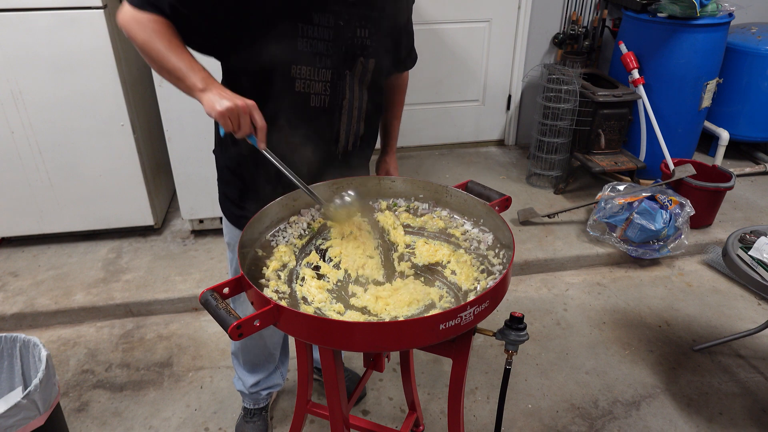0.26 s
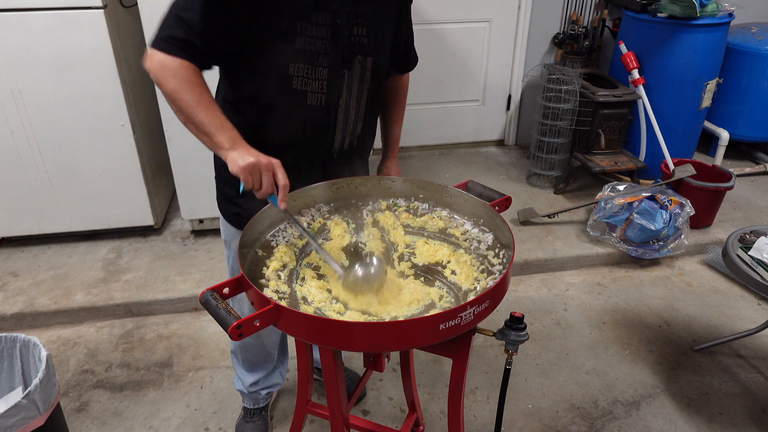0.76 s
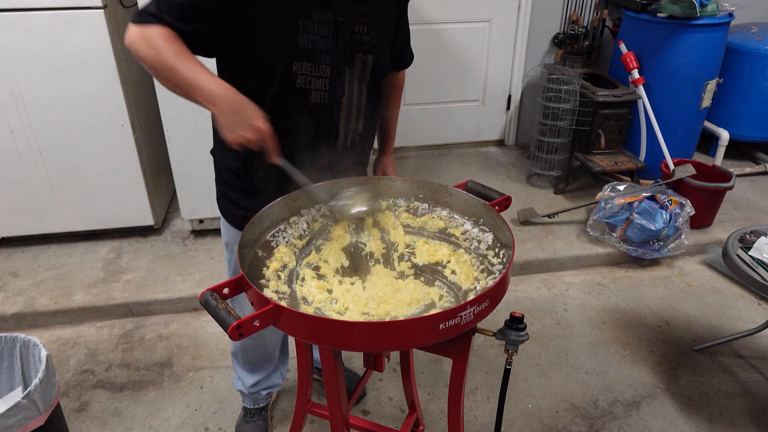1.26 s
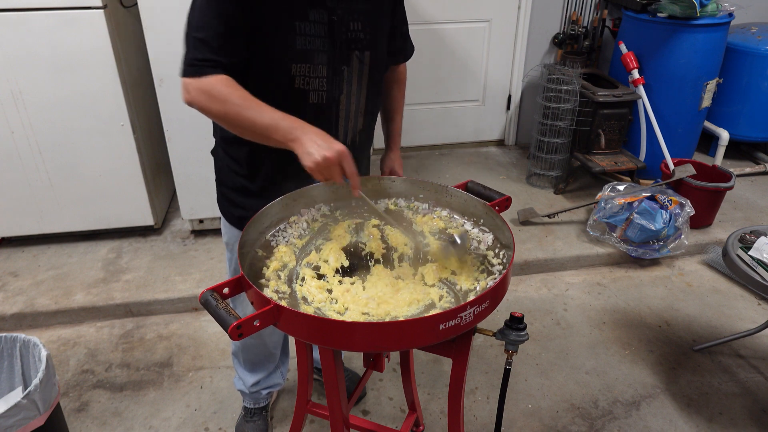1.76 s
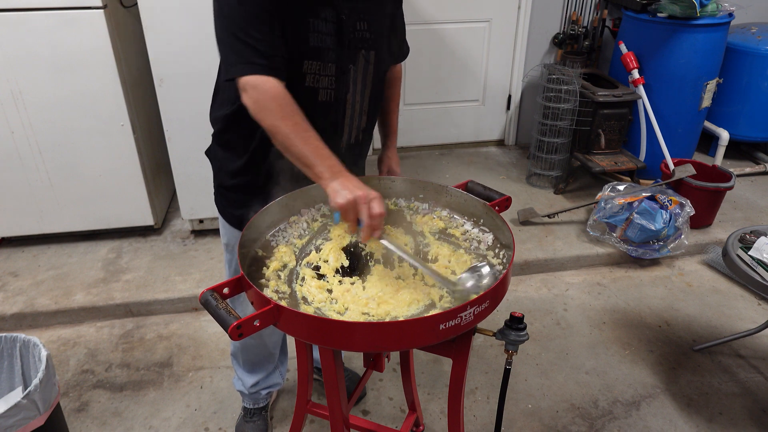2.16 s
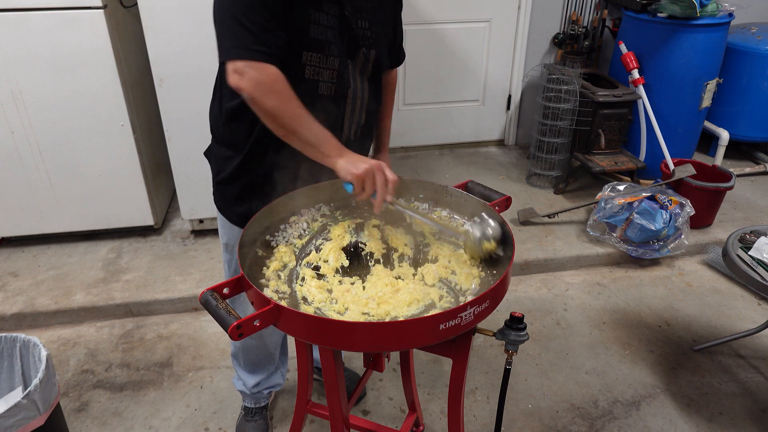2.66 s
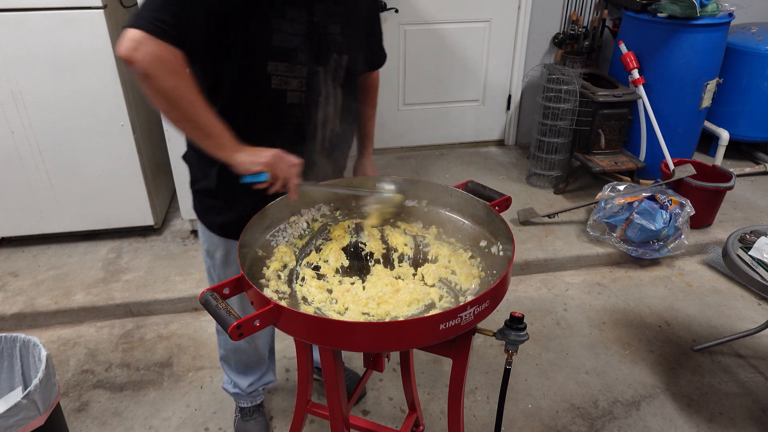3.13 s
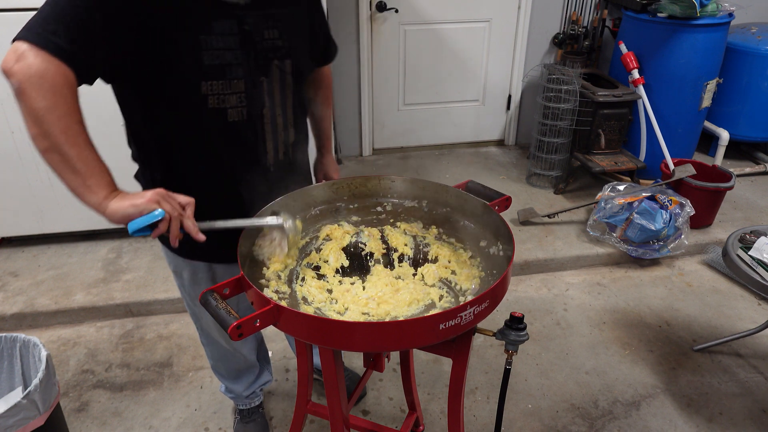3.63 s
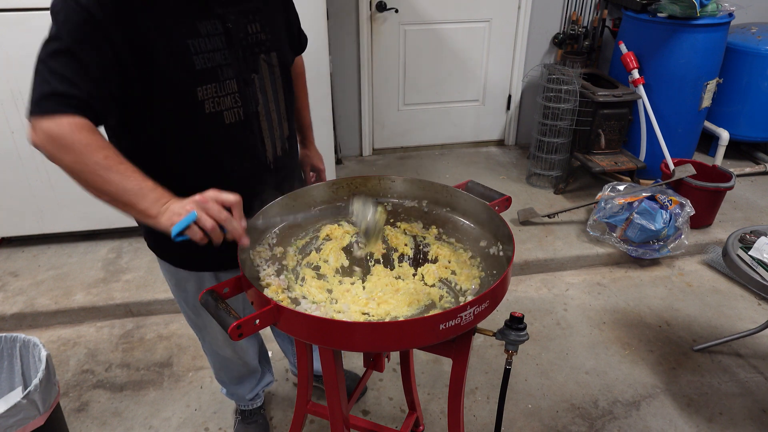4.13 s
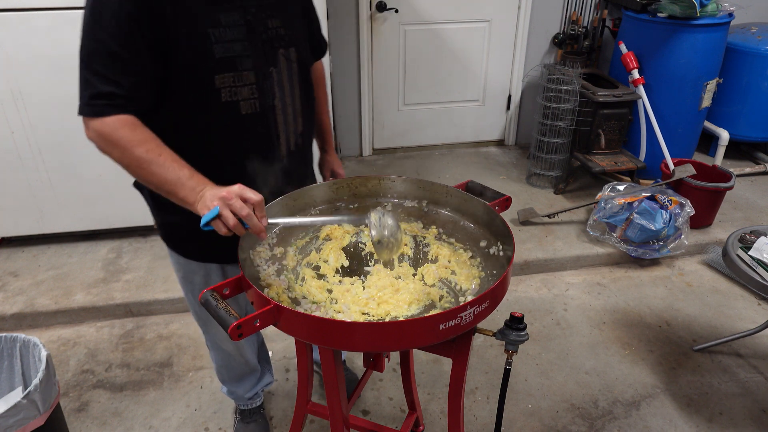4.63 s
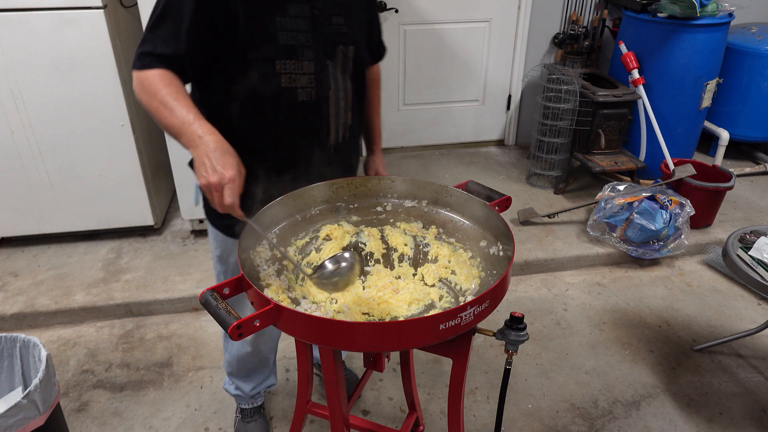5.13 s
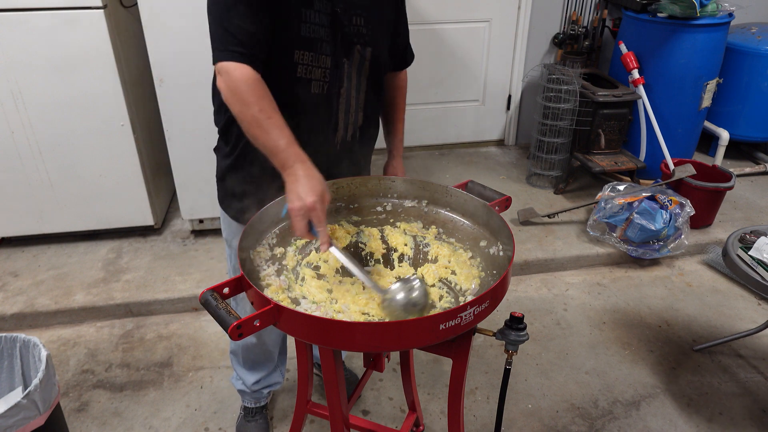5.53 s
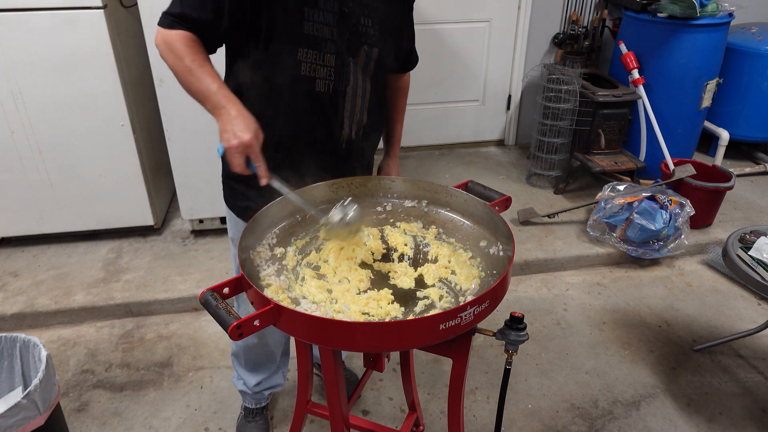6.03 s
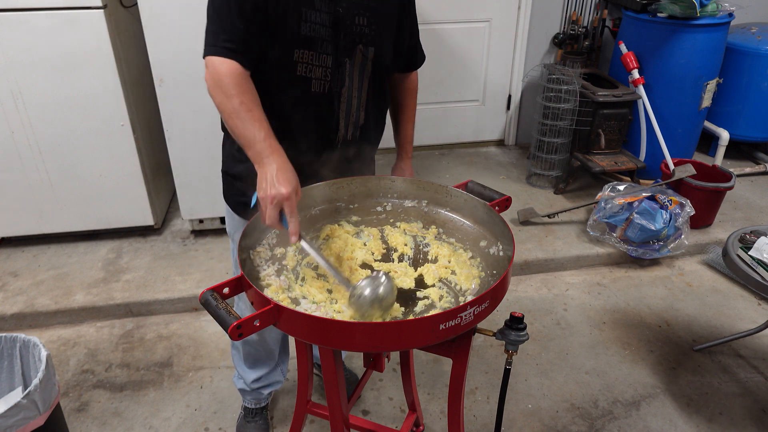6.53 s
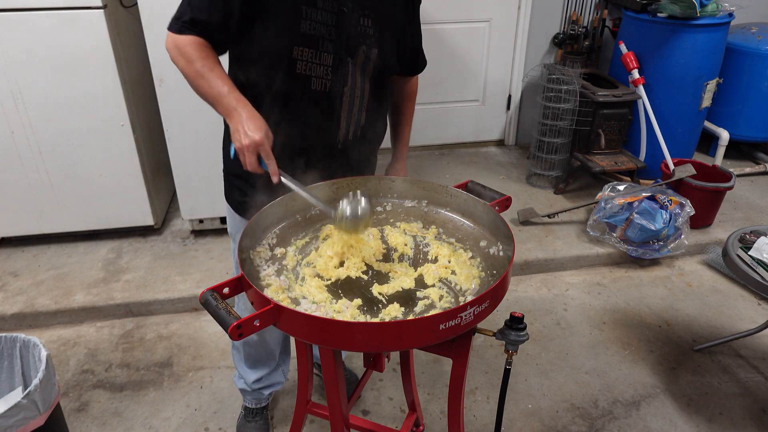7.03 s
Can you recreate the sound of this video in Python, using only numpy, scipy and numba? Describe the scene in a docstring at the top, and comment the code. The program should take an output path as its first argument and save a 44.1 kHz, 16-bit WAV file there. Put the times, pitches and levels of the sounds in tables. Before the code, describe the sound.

Eggs sizzle in oil in a wide metal pan throughout, the fizz swelling after stirs, over the faint low rush of a gas burner. At about 0.5 seconds a steel ladle knocks the pan and gives a brief scrape. Loud, bright clangs follow from 1.2 to 1.6 seconds, and the strongest cluster comes at about 2.1 seconds. The ladle's bowl rings on after the blows, and the pan rocks on its stand with dull bumps. From 2.5 to 4 seconds a long rasping scrape travels around the pan, ending with a light knock. Softer frying and a faint ring remain until a short, firmer scrape from 5.6 to 5.9 seconds. Two light knocks come near 6.8 seconds, and single spits of oil pop through the last seconds. Everything is heard close and straight ahead, with a short echo from bare garage walls.

```python
'''A steel ladle stirs scrambled eggs in a wide metal pan on a gas burner stand, in a garage.
The ladle knocks and scrapes the pan, and its bowl sings on; the pan rocks on its stand.
Oil sizzles and spits, flaring up after every stir, over the low rush of the burner.
Heard close, as from one microphone with the pan straight ahead and a short tail off the bare walls.'''
import sys
import numpy as np
from scipy import signal
from scipy.fft import rfft, irfft
from scipy.io import wavfile
from scipy.ndimage import uniform_filter1d, minimum_filter1d
from numba import njit

SR = 44100
rng = np.random.default_rng(int(sys.argv[2]) if len(sys.argv) > 2 else 0)


def unload_wav(signal):
    """Save mono or channel-first audio to the path in sys.argv[1] as 16-bit WAV at rate SR, clipped to [-1, 1]."""
    wavfile.write(
        sys.argv[1],
        SR,
        np.round(np.clip(np.atleast_2d(signal).T, -1, 1) * 32767).astype(np.int16),
    )


N = 321489
T = np.arange(N) / SR

# Levels in the tables are relative; spectra give the level per Hz.
# spectrum of the gas flame: f/Hz, level/dB
FLAME_SPECTRUM = [(20, -4), (42, -6.5), (65, -2.5), (95, -7), (125, 6), (155, 1.5), (200, -5), (330, -4),
                  (500, -6), (1000, -10), (2000, -16.5), (6000, -30)]
# spectra of the oil's fine fizz and wet crackle: f/Hz, level/dB
FIZZ_SPECTRUM = [(1500, -17), (3500, -7), (4600, -3), (5600, 0), (7200, 0.5), (8300, -3.5), (9500, -10.5),
                 (12000, -14.5), (16000, -16.5)]
CRACKLE_SPECTRUM = [(300, -9), (700, -3), (1100, 4.5), (1700, 1.5), (2800, 3), (4000, -0.5), (5500, -13),
                    (9000, -24), (16000, -23)]
# wet egg is turned onto hot metal and the frying flares up: peak t/s, level/dB
STIR_FLARES = [(0, -39), (.19, -62), (.75, -40.5), (1.55, -43.5), (3.6, -48.5), (5.8, -40.5), (6.6, -48),
               (6.85, -47.5), (7.15, -48)]
# the ladle bowl's modes, in three pairs: f/Hz, level/dB, t60/s
BOWL_PAIRS = [
    [(556.7, -0.5, 3.22), (900, -6, 1.84)],
    [(710, -1.5, 3.56), (1061, -6.5, 3.6)],
    [(731.6, -0.5, 1.9), (872, -3, 2.07)],
]
# the bowl ringing free: start t/s, damped from t/s, then starting level/dB of each pair
FREE_RINGS = [(0, 1.188, -32, -36, -30), (1.342, 2.098, -29, -45.5, -55), (2.098, 2.465, -48.5, -37, -29.5),
              (3.62, 5.497, -65, -44.5, -56)]
# the stand's low modes: f/Hz, level/dB, t60/s
FRAME_MODES = [(113.1, -15.5, 0.45), (180, -4.5, 0.14), (232.6, -9.5, 0.36), (288.5, -1.5, 0.16),
               (318, -5.5, 0.29), (338.6, -12, .22), (410, -14, 0.21), (447.7, -3.5, 0.37), (536, -36, .12)]
# the pan set rocking: t/s, level/dB, gap to the first rebound/s, loss per rebound/dB
PAN_ROCKS = [(.066, -26.5, 0.057, 9), (.649, -20, 0.095, 7.5), (.854, -21.5, 0.067, 6),
             (1.212, -21, 0.16, 9), (1.517, -17, 0.093, 4), (2.098, -22, .139, 9), (3.866, -28.5, 0.077, 2),
             (5.564, -38.5, .07, 13)]
# ladle on pan: t/s, level/dB, dull above f/Hz, favoured f/Hz, contact/s, pan ring up and stem down/dB
LADLE_BLOWS = [(0.492, -13.5, 2500, 1260, 0.00033, -8), (0.5093, -20, 5000, 1190, 0.00077, -4),
               (.617, -25, 9500, 5640, 0.0037, 2), (0.647, -14.5, 1320, 330, 0.0055, -10),
               (1.2118, 0.5, 12400, 2580, 0.0038, 8.5), (1.3063, -8.5, 1500, 1290, 0.0068, -6),
               (1.338, -7, 14000, 2460, 0.0026, -13), (1.347, -5.5, 1770, 1110, 0.0044, -2),
               (1.5195, -13, 2380, 1290, 0.0028, 2.5), (1.574, -24.5, 1980, 1080, 0.0043, 10.5),
               (1.596, -25, 2100, 1220, 0.0029, -3), (2.0981, 4, 4100, 1520, 0.004, 9.5),
               (2.124, -8.5, 2200, 1820, .009, -5), (2.141, -6, 2000, 1060, 0.0087, -5),
               (2.175, -15, 2200, 980, 0.0051, 5), (2.254, -11, 3270, 950, 0.014, -2),
               (2.44, -24.5, 1400, 950, .012, -3), (3.7962, -23, 3460, 1360, 0.02, -2),
               (5.5618, -25.5, 5500, 1290, 0.002, 3), (5.843, -27.5, 2400, 1240, 0.012, 6.5),
               (6.7467, -19.5, 8000, 1410, 0.0084, 0), (6.829, -26.5, 2600, 1460, 0.028, -1.5)]
# clear modes of the pan and of the ladle's stem: f/Hz, level/dB, t60/s
PAN_MODES = [(335.3, -6.5, 0.26), (515.3, -8, 0.35), (738, -11, 0.32), (883, -7.5, 0.82), (947, -1, 0.38),
             (978, 4, .48), (1075, 0, .45), (1134, -3.5, .33), (1319, -8.5, .4), (1404, -11, .42),
             (1462, -15, .38), (1626, -19, .4), (1793, -9, .36), (1818, -12, .3), (2046, -12, .35),
             (2562, -14, .3), (2637, -3.5, .24), (2840, -13, 0.42), (3456, -35.5, 0.55), (4000, -11, 0.52),
             (4130, -9, 0.28), (7440, -7, 0.37)]
STEM_MODES = [(2288, -12, .35), (2708, -9, .3), (3714, -6, .32), (3926, -6, .35), (4533, -14, .4),
              (5271, -5, .28), (5373, -8, .45), (5416, -3, .45), (6648, -2, .25), (6971, -1, .34),
              (8430, -10, .32), (8640, -9, .3)]
# spectrum of the pan's dense wash of modes: f/Hz, level/dB
CLANG_SPECTRUM = [(100, -18), (320, 5), (700, -1), (1100, 2), (1500, -1), (1950, -1.5), (2600, -1),
                  (3200, -4.5), (3900, -2.5), (4700, -3), (6500, 0.5), (8300, -5.5), (10000, -16),
                  (16000, -25.5)]
# resonances of the ladle pressed on the pan, mid rasp and bright edge: f/Hz, width/Hz, level/dB
RASP_BANDS = [(1448, 89, 2.5), (2394, 60, 0), (2714, 180, 4), (3604, 105, 5.5), (3870, 330, 1.5)]
EDGE_BANDS = [(5277, 230, 3), (6010, 230, -4.5), (6620, 720, -1), (8200, 120, -8)]
# spectra of the pan's body under a scrape and of fine grit dragged by the ladle: f/Hz, level/dB
BODY_SPECTRUM = [(200, -42), (330, 6), (480, -26), (580, 4.5), (720, -13.5), (820, -6), (985, 0),
                 (1120, -1), (1400, 0.5), (1750, -7.5), (2500, -32.5)]
GRIT_SPECTRUM = [(800, -28), (1700, 12), (4000, 16), (8300, -2), (9400, -22), (12000, -10), (16000, -4)]
# the contact point travels round the pan: t/s, scratch f/Hz, pan drone f/Hz
CONTACT_PATH = [(.75, 2520, 950), (2.541, 2340, 960), (2.62, 2770, 950), (2.82, 2830, 1000),
                (2.85, 3250, 1020), (2.98, 3100, 1000), (3.05, 2840, 710), (3.19, 2960, 707),
                (3.26, 2850, 725), (3.55, 2470, 646), (3.75, 2380, 1234), (5.6, 3170, 1060),
                (5.74, 3750, 1010), (5.84, 2670, 1230)]
# the scratch and its overtones: multiple, level/dB
SCRATCH_PARTIALS = [(1, 5.5), (2, 0), (4, -20)]
# ladle pressure in a brief nudge, a long sweep round the wall and a short push across: t/s, level/dB
NUDGE = [(0.59, -40), (0.646, -30), (0.71, -44), (0.734, -27), (0.76, -29), (0.785, -32)]
SWEEP = [(2.54, -31.5), (2.574, -33), (2.654, -30.5), (3.318, -28), (3.414, -32), (3.422, -27.5),
         (3.5, -31.5), (3.532, -27.5), (3.662, -35.5), (3.778, -37), (3.804, -31.5), (3.868, -38.5),
         (3.904, -34), (3.96, -45.5)]
PUSH = [(5.57, -28.5), (5.578, -32.5), (5.652, -18), (5.684, -21), (5.756, -19), (5.78, -26), (5.83, -22),
        (5.91, -47)]
# strokes: pressure curve, meets the pan wall t/s, body/dB, body thin below f/Hz, scratch/dB, edge/dB
LADLE_STROKES = [(NUDGE, .72, -0.5, 820, 0.7, -23), (SWEEP, 2.53, -7.5, 555, 0, -2.06),
                 (PUSH, 5.72, -9, 770, -10, -1.2)]
# the loudest spits of oil: t/s, peak level/dB
LOUD_SPITS = [(1.1489, -24), (4.146, -33), (4.342, -29), (5.521, -28), (6.122, -22), (6.2298, -28),
              (7.0878, -26), (7.187, -22.5)]


def undb(db):
    """Decibels to gain."""
    return 10 ** (np.asarray(db) / 20)


def unit(x):
    """Scale to rms 1."""
    return x / np.sqrt(np.mean(x ** 2))


def add(out, s, x):
    """Mix x into out from time s."""
    i = max(int(s * SR), 0)
    out[i:i + len(x)] += x[:max(N - i, 0)]


def convolve(x, response):
    """Pass x through a response, keeping its length."""
    return signal.fftconvolve(x, response)[:len(x)]


def colour(x, spectrum, size=2048):
    """Minimum-phase filter of unit energy, shaped by rows of f/Hz, level/dB."""
    hz, db = np.transpose(spectrum)
    shape_db = np.interp(np.log(np.arange(size // 2 + 1) * SR / size + 1), np.log(hz), db)
    cepstrum = irfft(np.log(undb(shape_db)))
    cepstrum[1:size // 2] *= 2
    cepstrum[size // 2 + 1:] = 0
    response = irfft(np.exp(rfft(cepstrum)))
    return convolve(x, response / np.linalg.norm(response))


def cut(x, hz, kind, order=2):
    """Low-pass or high-pass."""
    return signal.sosfilt(signal.butter(order, min(hz, SR / 2 - 1000), kind, fs=SR, output="sos"), x)


def between(x, low_hz, high_hz):
    """High-pass, then low-pass."""
    return cut(cut(x, low_hz, "high"), high_hz, "low")


@njit
def resonate(x, hz, width_hz):
    """Band-pass whose centre can move every sample."""
    y, band_state, low_state = np.empty(len(x)), 0., 0.
    for i in range(len(x)):
        g, damping = np.tan(np.pi * hz[i] / SR), width_hz / hz[i]
        band = (band_state + g * (x[i] - low_state)) / (1 + g * (g + damping))
        band_state = 2 * band - band_state
        low_state += 2 * g * band
        y[i] = damping * band
    return y


def resonances(x, bands, ratio):
    """Sum of band-passes, all shifted by a moving frequency ratio."""
    return sum(undb(db) * resonate(x, hz * ratio, float(width)) for hz, width, db in bands)


def fade(t, t60):
    """Full level until t = 0, then free decay, 60 dB down after t60."""
    return np.exp(-np.log(1000) * np.maximum(t, 0) / t60)


def ring(modes):
    """One second of struck modes, unit energy; neighbours start in opposite directions."""
    t = T[:SR]
    y = sum((-1) ** k * undb(db) * fade(t, t60) * np.sin(2 * np.pi * hz * t)
            for k, (hz, db, t60) in enumerate(modes))
    return y / np.linalg.norm(y)


def walk(rate):
    """Smooth random wander of spread near 1."""
    knots = rng.standard_normal(4096)
    return np.interp(T * rate, np.arange(len(knots)), knots)


def grains(rate, spread_db):
    """Random tiny impulses, about rate a second, most small and a few large."""
    chance, size = rng.random(N), np.minimum(rng.exponential(size=N), 5)
    return unit((chance < rate / SR) * undb(spread_db * size) * rng.choice([-1, 1], N))


def burner(level_db=-55, flutter_db=1):
    """The gas flame rushes softly under the pan."""
    rush = unit(colour(rng.standard_normal(N), FLAME_SPECTRUM, size=8192))
    return rush * undb(level_db + flutter_db * walk(10))


def frying(rest_db, flare_db, t60, rise_s=0.098):
    """Strength of the frying: a resting level, and at each stir a flare that dies as water boils off."""
    flares = (undb(db + flare_db) * np.clip((T - s) / rise_s + 1, 0, 1) * fade(T - s, t60)
              for s, db in STIR_FLARES)
    return np.sqrt(undb(rest_db) ** 2 + sum(flare ** 2 for flare in flares))


def sizzle(flicker_db=1, pops_db=-20):
    """Steam bubbles burst in the oil: a fine fizz with scattered pops, and a coarser wet crackle."""
    fizz = unit(colour(grains(rate=7000, spread_db=3), FIZZ_SPECTRUM))
    pops = unit(between(grains(rate=37, spread_db=2), 1800, 6000))
    crackle = unit(colour(grains(rate=3000, spread_db=1), CRACKLE_SPECTRUM))
    fine = (fizz + undb(pops_db) * pops) * frying(rest_db=-52.5, flare_db=0, t60=5.37)
    coarse = crackle * frying(rest_db=-59, flare_db=-2, t60=2.8)
    return (fine + coarse) * undb(flicker_db * walk(25))


def ladle_bowl(damped_t60=0.82):
    """The ladle's bowl rings on, then fades quickly from each listed damping time."""
    out, t = np.zeros(N), T[:2 * SR]
    for s, damped_s, *levels_db in FREE_RINGS:
        tone = sum(undb(pair_db + db) * fade(t, t60) * np.sin(2 * np.pi * hz * t)
                   for pair, pair_db in zip(BOWL_PAIRS, levels_db) for hz, db, t60 in pair)
        add(out, s, tone * fade(t - (damped_s - s), damped_t60))
    return out


def rocking_pan(bump_t60=0.093, bump_db=-15, strength_db=17, landings=4, gap_shrink=0.63):
    """The heavy pan tips onto its stand and rebounds ever sooner: dull bumps and the frame's modes."""
    out, frame = np.zeros(N), ring(FRAME_MODES)
    for s, db, gap_s, loss_db in PAN_ROCKS:
        for k in range(landings):
            burst = rng.standard_normal(SR) * fade(T[:SR], bump_t60)
            bump = cut(cut(burst, 610, "low", order=4), 134, "high")
            add(out, s, undb(db + strength_db - k * loss_db) * (frame + undb(bump_db) * bump))
            s += gap_s * gap_shrink ** k
    return out


def ladle_knocks(crack_t60=0.029, wash_db=-44, wash_t60=0.75, pan_db=-12, ladle_db=-18.5,
                 hollow_db=6, favour_db=5, strength_db=17):
    """Each blow chatters briefly, then the pan's wash, its clear modes and the ladle stem ring out."""
    out, t, steady = np.zeros(N), T[:SR], np.ones(SR)
    for s, db, dull_hz, favoured_hz, contact_s, lean_db in LADLE_BLOWS:
        contact = fade(t - contact_s, crack_t60)
        contact /= np.linalg.norm(contact)
        wash = fade(t, wash_t60) * undb(wash_db)
        clang = colour(rng.standard_normal(SR) * np.hypot(contact, wash), CLANG_SPECTRUM)
        thin_hz = 677 * (dull_hz / 3410) ** 0.63  # a harder blow is both brighter and thinner
        pan = cut(cut(clang, thin_hz, "high", order=1), 270, "high")
        pan += undb(pan_db + lean_db) * ring(PAN_MODES)
        # the spot that is struck favours one group of the pan's modes
        pan += undb(favour_db) * resonate(pan, favoured_hz * steady, width_hz=200.)
        ladle = ring(STEM_MODES) + undb(hollow_db) * resonances(clang, RASP_BANDS + EDGE_BANDS, steady)
        # egg between the two metals softens the blow
        blow = cut(pan + undb(ladle_db - lean_db) * ladle, dull_hz, "low")
        add(out, s, undb(db + strength_db) * blow)
    return out


def stick_slip(judder_db=1.5, scratch_width_hz=240., drone_db=-2, pan_db=-9, stem_db=-11, grit_db=-7):
    """Dense catches of steel on the pan excite a rasp, a scratch, the pan's body and a bright edge."""
    slips = grains(rate=5000, spread_db=1.5) * undb(judder_db * walk(110))
    when, *pitches = np.transpose(CONTACT_PATH)
    scratch_hz, drone_hz = (np.interp(T, when, hz) for hz in pitches)
    waver = 1 + .016 * walk(16)  # the hand's pressure is never even
    rasp = unit(between(resonances(slips, RASP_BANDS, waver), 1000, 4600))
    scratch = sum(undb(db) * resonate(slips, k * scratch_hz, k * scratch_width_hz)
                  for k, db in SCRATCH_PARTIALS)
    scratch = unit(cut(cut(scratch, 1800, "high"), 9400, "low", order=1))
    body = unit(colour(slips, BODY_SPECTRUM))
    body += undb(drone_db) * unit(resonate(slips, drone_hz, width_hz=70.))
    body += undb(pan_db) * convolve(slips, ring(PAN_MODES))
    edge = unit(between(resonances(slips, EDGE_BANDS, waver), 5040, 7100))
    edge += undb(stem_db) * convolve(slips, ring(STEM_MODES))
    edge += undb(grit_db) * colour(grains(rate=1000, spread_db=0.5), GRIT_SPECTRUM)
    return rasp, scratch, body, unit(edge)


def ladle_scrapes(rasp_db=-7, scratch_db=-3, body_db=-2, ramp_s=0.015, wall_rise_s=0.022):
    """Pressure sets each stroke's level and brightness; the body joins in at the pan's wall."""
    out = np.zeros(N)
    rasp, scratch, body, edge = stick_slip()
    for pressure, meets_wall_s, wall_db, thin_hz, bite_db, edge_db in LADLE_STROKES:
        s, db = np.transpose(pressure)
        level_db = np.interp(T, s, db)
        touching = np.clip(np.minimum(T - s[0], s[-1] - T) / ramp_s + 1, 0, 1)
        at_wall = np.clip((T - meets_wall_s) / wall_rise_s + .5, 0, 1)
        wall = at_wall * unit(cut(body, thin_hz, "high", order=4))
        # as the hand eases off, the edge and the scratch lose more and the body less
        eased_db = db.max() - level_db
        stroke = (undb(rasp_db) * rasp
                  + undb(edge_db - 0.38 * eased_db) * edge
                  + undb(scratch_db + bite_db - 2 * eased_db) * scratch
                  + undb(body_db + wall_db + 0.13 * eased_db) * wall)
        out += touching * undb(level_db) * stroke
    return out


def oil_spits(pop_t60=0.0021):
    """Larger droplets burst one by one."""
    out, t = np.zeros(N), T[:SR // 20]
    for s, db in LOUD_SPITS:
        pop = between(rng.standard_normal(len(t)) * fade(t, pop_t60), 2800, 7500)
        add(out, s, undb(db) * pop / np.abs(pop).max())
    return out


def garage(x, t60=0.46, treble_t60=0.19, tail_db=-9, first_echo_s=0.0017, build_s=0.011):
    """Concrete floor and bare walls return a short tail whose treble dies first."""
    t, noise = T[:SR], rng.standard_normal(SR)
    low = cut(noise, 2400, "low", order=1)
    tail = low * fade(t, t60) + (noise - low) * fade(t, treble_t60)
    tail *= np.clip((t - first_echo_s) / build_s, 0, 1)
    return x + undb(tail_db) * convolve(x, tail / np.linalg.norm(tail))


def scene():
    """The pan is straight ahead of the microphone, alike in both channels; bowl and flame stay dry."""
    pan = ladle_knocks() + rocking_pan() + ladle_scrapes() + sizzle() + oil_spits()
    sound = garage(pan) + ladle_bowl() + burner()
    return np.array([sound, sound])


def record(dry, ceiling=.79, top_hz=15900):
    """A fast limiter holds the loudest blows; the recorder cuts the top."""
    span = SR // 200  # 5 ms
    gain = ceiling / np.maximum(np.abs(dry).max(axis=0), ceiling)
    gain = uniform_filter1d(minimum_filter1d(gain, span), span)
    return signal.sosfilt(signal.ellip(10, .2, 80, top_hz, fs=SR, output="sos"), dry * gain)


dry = scene()
out = record(dry)
unload_wav(out)
```